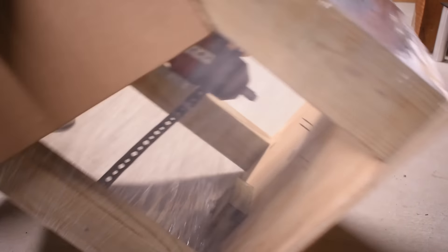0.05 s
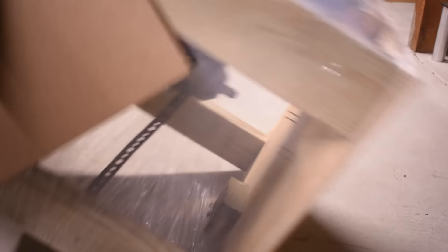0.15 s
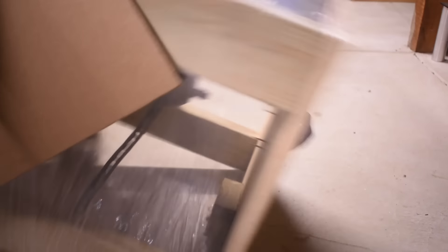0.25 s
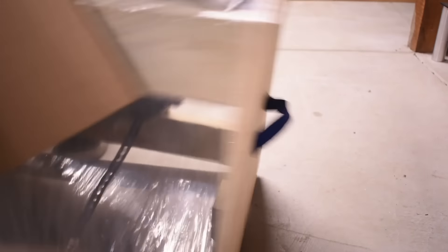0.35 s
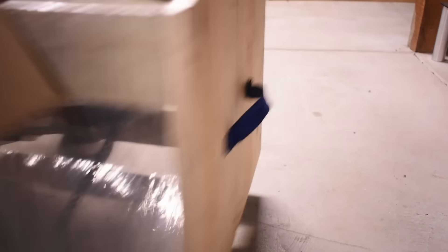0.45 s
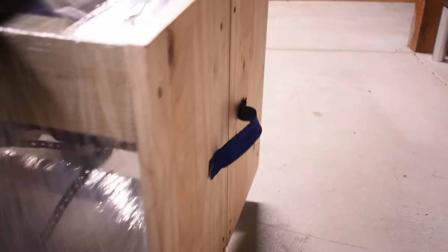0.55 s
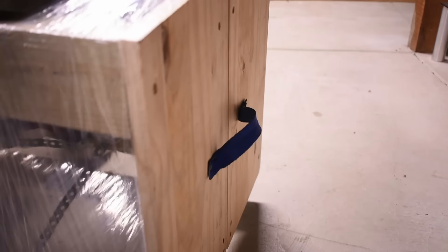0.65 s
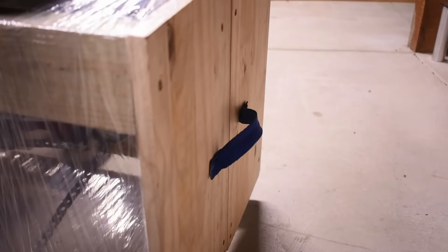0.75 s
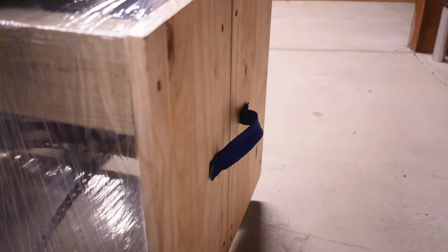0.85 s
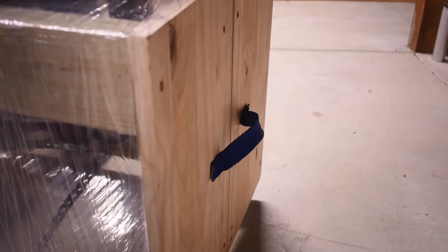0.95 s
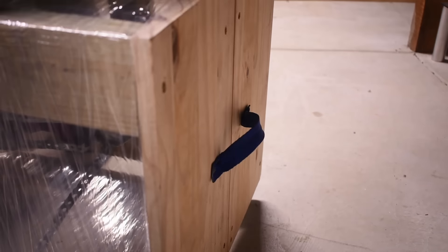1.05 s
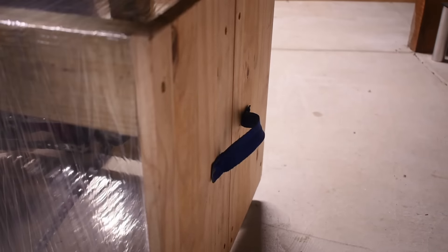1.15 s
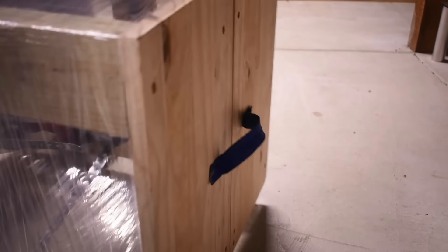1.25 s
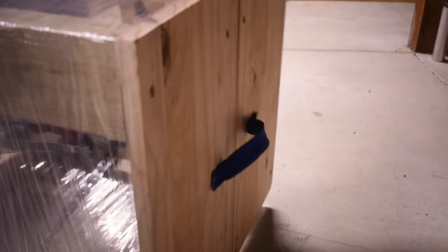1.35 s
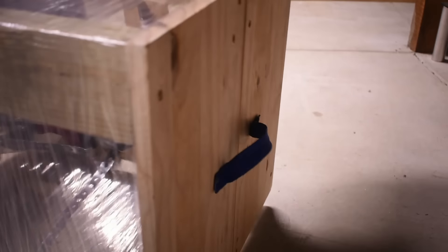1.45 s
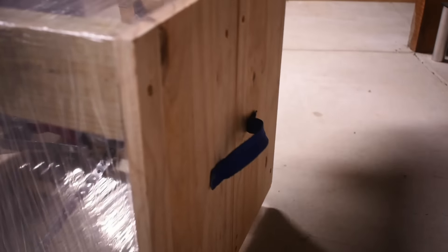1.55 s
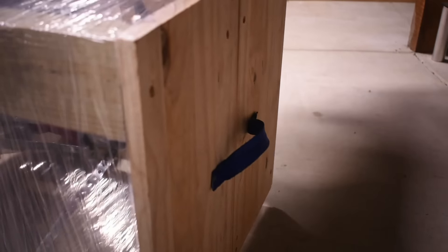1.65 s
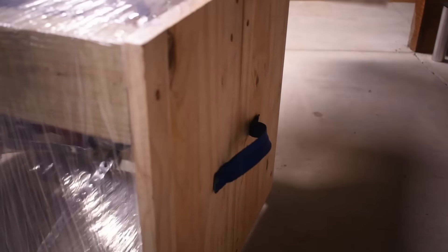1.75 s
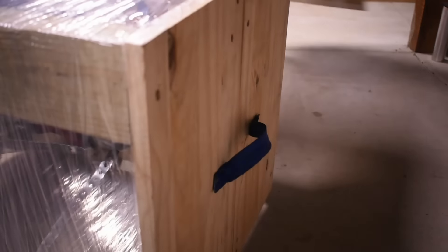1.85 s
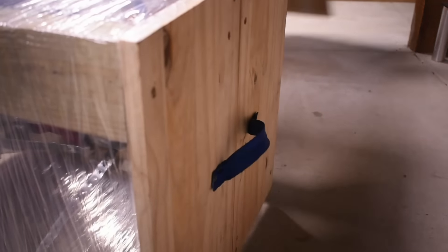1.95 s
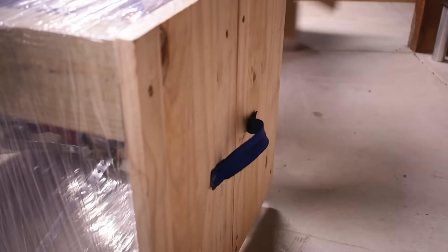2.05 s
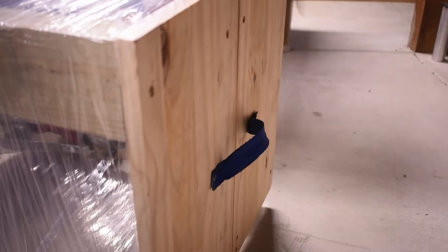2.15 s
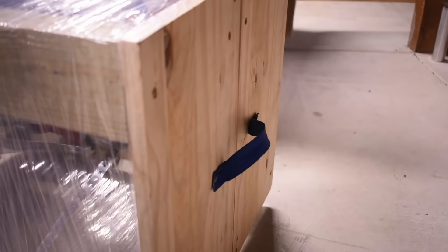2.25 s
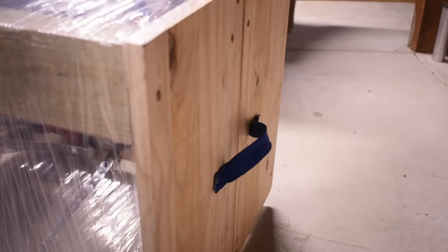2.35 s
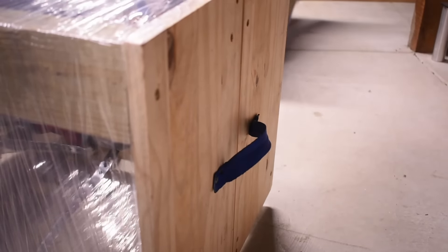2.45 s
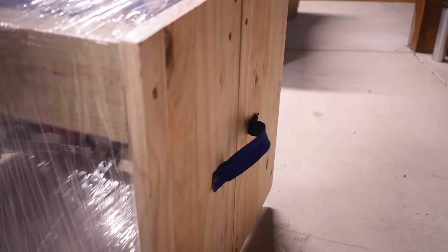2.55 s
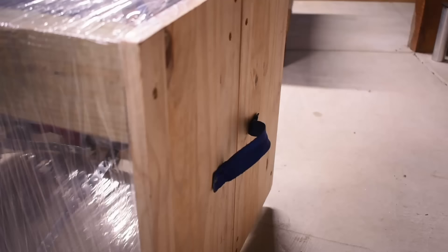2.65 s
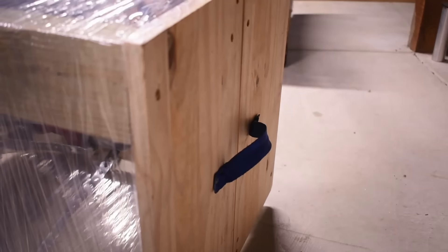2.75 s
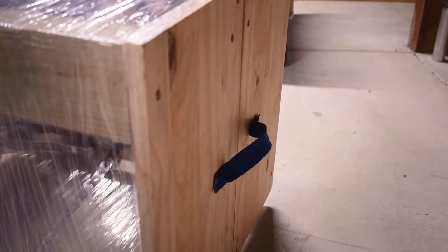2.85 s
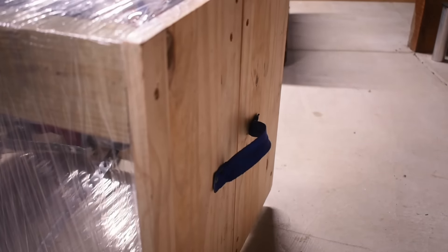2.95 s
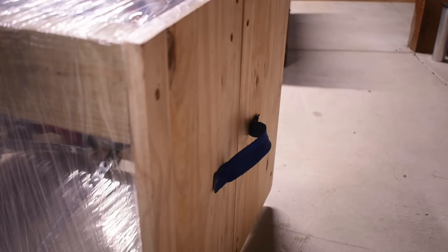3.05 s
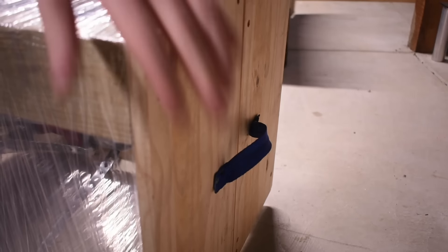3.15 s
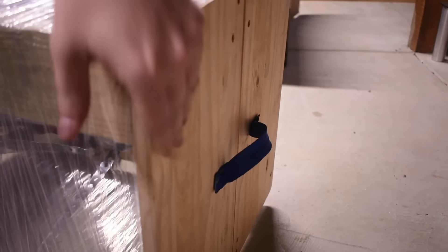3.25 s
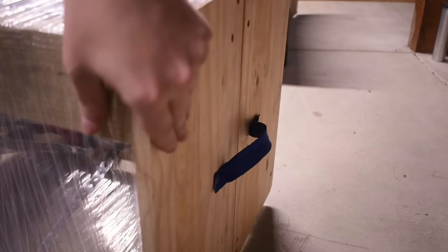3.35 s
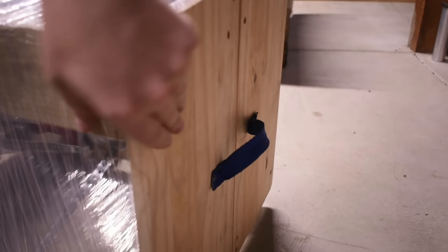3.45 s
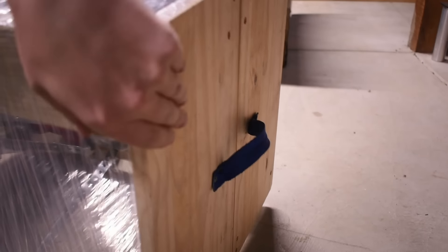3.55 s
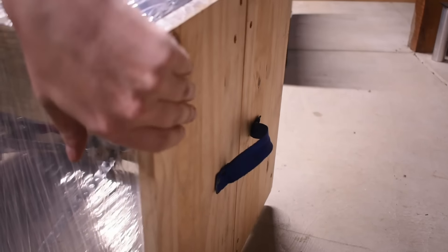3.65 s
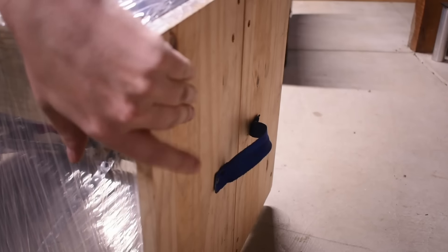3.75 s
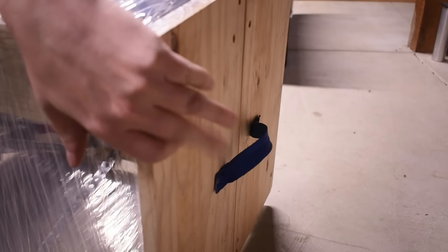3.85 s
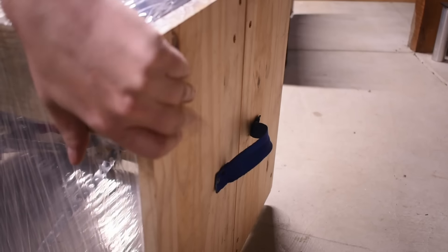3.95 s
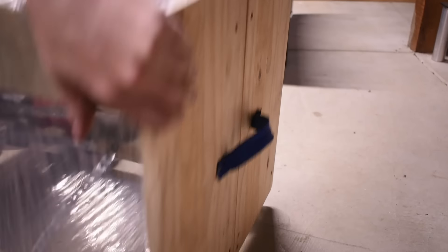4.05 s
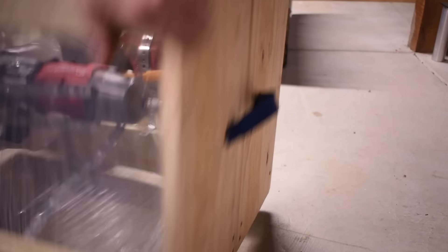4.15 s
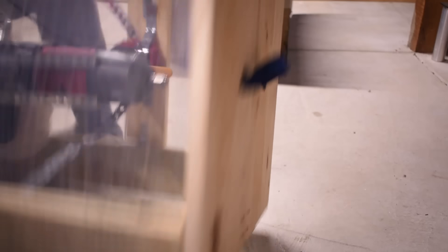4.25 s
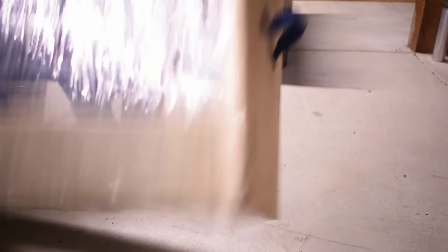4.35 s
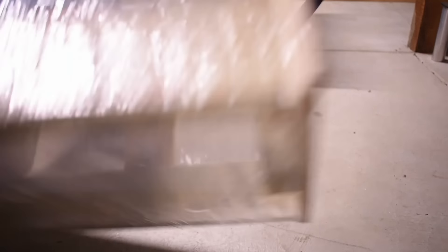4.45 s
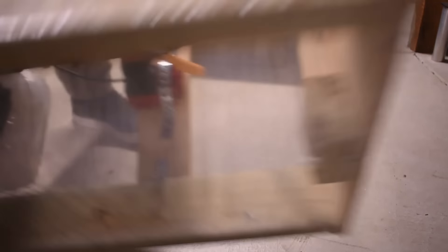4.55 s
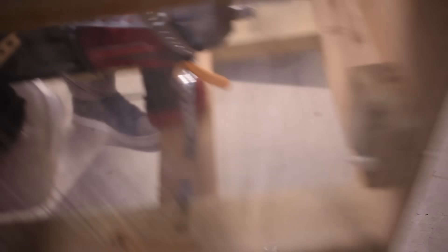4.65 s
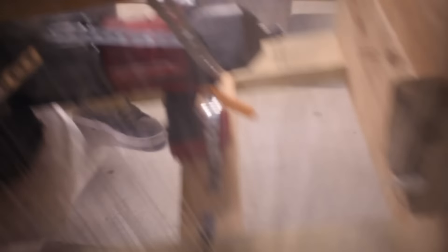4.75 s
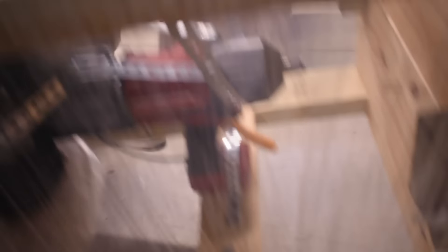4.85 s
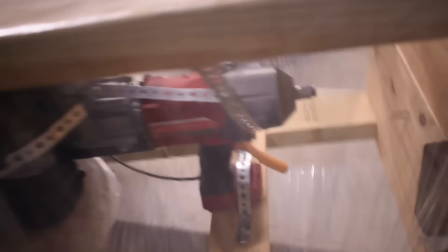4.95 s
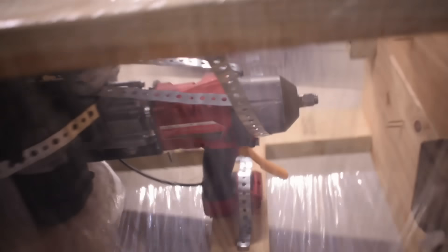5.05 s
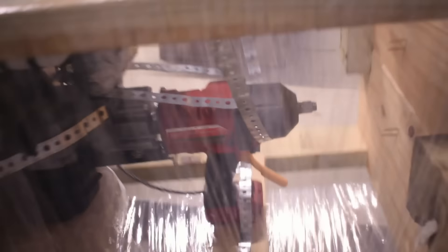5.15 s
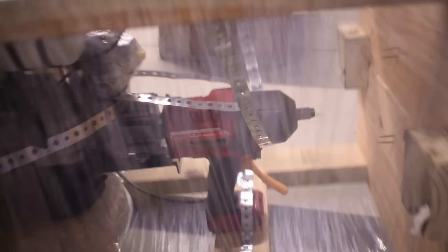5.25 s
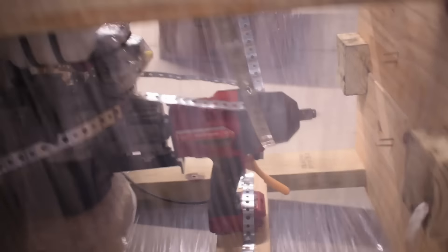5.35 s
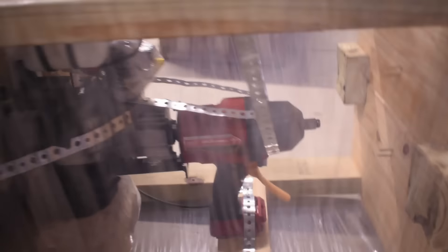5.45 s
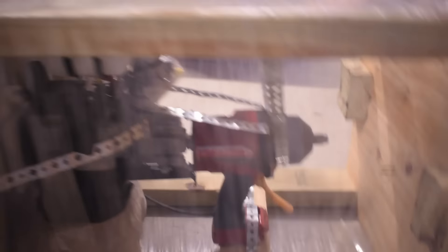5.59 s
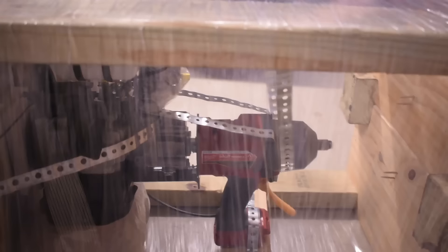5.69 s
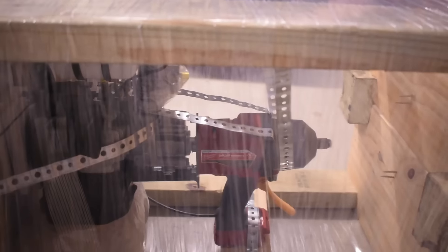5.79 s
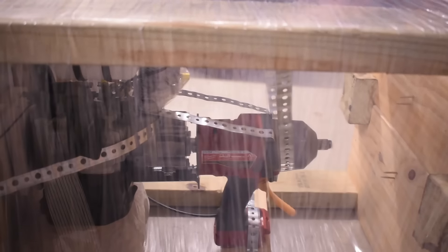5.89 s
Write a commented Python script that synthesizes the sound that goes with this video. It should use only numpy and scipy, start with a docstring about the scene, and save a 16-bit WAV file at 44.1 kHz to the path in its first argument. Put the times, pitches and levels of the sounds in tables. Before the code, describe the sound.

Hollow wooden knocks and crackling stretch wrap as a crate is tipped and shifted on a workshop floor.

```python
"""Hollow wooden knocks and crackling plastic: a crate in stretch wrap is tipped, set down and turned. Each
knock on the workshop floor, and each light tap of fingertips on the boards, rings the boards and shakes the
tight plastic film. Between knocks the film crinkles, rubs and snaps, and the wood drags and squeaks. Steel
straps inside jingle as the crate first comes down. Near the end its open side turns toward the listener and it
sounds hollower."""
import sys
import numpy as np
from scipy import signal
from scipy.fft import irfft
from scipy.io import wavfile
from scipy.ndimage import uniform_filter1d

SR = 44100
rng = np.random.default_rng(int(sys.argv[2]) if len(sys.argv) > 2 else 0)


def materialize(psi):
    """Save the field psi as 16-bit PCM at rate SR to the path in sys.argv[1].

    A 1-D psi becomes a single channel; in a 2-D psi each row is a channel.
    """
    bounded = np.clip(np.atleast_2d(psi).T, -1, 1)
    quanta = np.round(bounded * 32767).astype(np.int16)
    wavfile.write(sys.argv[1], SR, quanta)


N = 261072

# tone of the faint background hush and microphone hiss: pitch_hz, level_db
HUSH_TONE = [(20, 3.5), (33, 15), (60, 3), (110, -5), (170, -3), (250, -8), (500, -28.5), (1000, -17),
             (2500, -22), (6000, -21.5), (16000, -32)]
# how long the workshop's echo takes to fall by 60 dB: pitch_hz, fade_s
ROOM_FADE = [(100, .4), (300, .3), (1000, 0.32), (3000, 0.31), (8000, 0.38), (16000, .26)]
# how much left and right differ, next to what they share: pitch_hz, difference_db
STEREO_WIDTH = [(100, -42), (350, -32), (700, -24), (1400, -27), (2800, -16), (5600, -9.5), (11000, -3.5),
                (15000, -3.5)]
# how far the crate's open side faces the listener: time_s, share_0_to_1
OPEN_SIDE = [(0, 0), (3.9, 0), (4.4, 1), (5.92, 1)]
# tone of sound coming through the open side: pitch_hz, gain_db
HOLLOW_TONE = [(30, -5), (70, -2), (115, -1), (170, -5.5), (250, -2), (480, 0.5), (800, -1.5), (1900, 1.5),
               (3400, 3.5), (5500, -0.5), (8000, -1), (12000, -3.5), (16000, -8.5)]

# how briskly the crate is moved: time_s, motion_db
MOTION = [(0, -17), (.16, -6.5), (.28, -7), (.45, -2), (.66, -6), (.8, -24), (1.13, -29), (1.35, -23),
          (1.55, -36), (1.95, -43), (2.34, -45), (2.66, -20), (2.97, -39), (3.22, -34), (3.5, -41),
          (4.6, -36), (5.24, -33), (5.46, -18), (5.82, -38)]
# how shuffling, rubbing and crinkling (a row each) follow it: full_motion_db, db_per_motion_db
MOTION_RESPONSE = [(-35.5, .97), (-46, .8), (-56, .76)]
# the base scuffs the floor: start_s, length_s, level_db
FLOOR_SCUFFS = [(.885, .065, -52), (1.0, .045, -50), (1.59, .03, -59), (1.69, .08, -62), (1.84, .07, -69),
                (2.03, .06, -65), (3.1, .09, -66), (4.16, .04, -62), (4.72, .03, -63), (4.84, .1, -65),
                (5.68, .018, -42)]
# the film is pulled or slides under a hand: start_s, length_s, rub_db, crinkle_db
HAND_STROKES = [(0, .055, -39, -43), (.1, .1, -50, -57), (.2, .08, -47, -59), (.305, .035, -44, -53),
                (.48, .03, -41, -55), (.588, .035, -34, -56), (.635, .03, -43, -51), (.74, .05, -56, -65),
                (.87, .07, -60, -68), (1.005, .03, -51, -63), (1.225, .03, -61, -66), (1.31, .09, -61, -64),
                (1.65, .075, -63, -65), (1.815, .03, -71, -77), (2.02, .08, -77, -81),
                (2.125, .06, -48, -48), (2.2, .045, -53, -55), (2.385, .035, -51, -60),
                (2.63, .09, -52, -55), (2.865, .05, -68, -66), (3.06, .07, -70, -75), (3.14, .09, -65, -68),
                (3.37, .07, -72, -76), (4.22, .04, -63, -72), (4.345, .07, -58, -60), (4.53, .13, -79, -77),
                (4.7, .045, -61, -67), (4.8, .14, -62, -66), (5.15, .06, -63, -68), (5.32, .05, -52, -51),
                (5.59, .04, -64, -71), (5.68, .035, -56, -61), (5.87, .05, -63, -70)]
# tones of shuffling wood, rubbing film and crinkling film: pitch_hz, level_db
SHUFFLE_TONE = [(20, -13.5), (32, 1.5), (55, -13), (85, 2), (120, -0.5), (170, -4.5), (235, -1.5),
                (340, -9.5), (520, -9.5), (720, -10), (1100, -29.5), (2500, -46.5)]
RUB_TONE = [(200, -35), (450, -1), (750, 2), (1100, 4.5), (1600, 1.5), (2100, -0.5), (2900, -1.5),
            (4000, -10), (6000, -35), (12000, -51.5)]
CRINKLE_TONE = [(1200, -62), (3000, -10), (4300, 2), (6300, 0), (8000, -3.5), (9500, -5.5), (12000, -6.5),
                (16000, -7)]
# wood and film stick and slip: middle_s, loud_part_s, pitch_hz, width_hz, level_db
SQUEAKS = [(.235, .04, 162, 19, -36), (0.308, 0.028, 243, 17, -40), (0.947, 0.038, 226, 12, -46.5),
           (2.67, .1, 129, 32, -40.5), (2.819, 0.17, 109, 33, -57.5), (3.202, 0.061, 520, 120, -67),
           (3.297, 0.17, 1360, 400, -75), (3.31, 0.09, 296, 50, -62), (3.31, .12, 2480, 800, -76),
           (3.614, 0.048, 215, 64, -61), (3.616, .05, 391, 29, -65.5), (4.236, 0.065, 242, 21, -55.5),
           (5.096, 0.035, 1710, 320, -59.5), (5.096, 0.02, 2760, 1800, -56),
           (5.915, 0.034, 1635, 220, -57.5)]
# the steel straps jingle: start_s, pitch_hz, width_hz, level_db, fade_s
STRAP_RINGS = [(.468, 12750, 110, -49, 0.14), (.478, 9600, 800, -56, .28), (.591, 2643, 119.5, -34, 0.2),
               (.595, 2920, 250, -38.5, 0.18), (.598, 9200, 1100, -51, 0.28)]
# the film snaps: start_s, crack_db, fizz_db
FILM_SNAPS = [(.314, -43, -47), (.664, -54, -64), (.987, -49.5, -72), (1.021, -50, -53),
              (1.236, -61, -59.5), (1.283, -70, -60), (1.48, -61, -66), (1.642, -63, -71),
              (1.972, -75, -74), (2.164, -45.4, -47), (2.598, -52, -58), (2.633, -52, -53.5),
              (3.677, -67, -80), (4.159, -54.4, -58.5), (4.192, -56, -66), (4.3165, -38, -55),
              (4.455, -47.5, -48.5), (4.686, -51, -63), (4.962, -35, -36.5), (5.081, -52.5, -80),
              (5.329, -48, -48), (5.373, -46.5, -51.5), (5.472, -53, -58), (5.514, -57.5, -58.5),
              (5.559, -60.5, -63.5), (5.678, -49, -50), (5.719, -51, -53.5), (5.862, -66.5, -66.5)]

# the notes the boards ring at: pitch_hz, level_db, fade_s
BOARD_NOTES = [(92, -11.5, 0.23), (117, -7.5, 0.55), (134, -8, 0.32), (179.5, -4, 0.29), (228.6, -0.5, .26),
               (240.8, -3, 0.28), (266.2, -4, 0.29), (302.3, -6.5, 0.26), (321.5, -3, .17),
               (375, -9.5, .18), (429, -11, 0.3), (479.3, -5, 0.14), (534.2, -5.5, 0.15), (590, -8, .17),
               (685, -6, 0.13), (774, -12, .2), (887, -14, 0.29), (985, -3.5, 0.12), (1045, -6.5, 0.24),
               (1415, -18, .18), (1665, -7, 0.11), (1807, -11, 0.13), (2008, -17, 0.15), (2160, -25.5, 0.2),
               (2510, -17.5, .2), (2680, -29.5, .25)]
# their many weaker notes, blurred into a wash of noise: pitch_hz, level_db
WASH_TONE = [(50, -7), (110, -5.5), (250, -3.5), (550, 0.5), (1000, -9), (1600, -10.5), (2800, -19),
             (4500, -20.5), (7000, -35.5), (16000, -42)]
# a knock's boom, thud, body, clack and film buzz (a row each): low_hz, high_hz
KNOCK_BANDS = [(70, 185), (185, 350), (350, 1300), (1300, 4200), (4200, 16000)]
# what each spot on the crate brings out when struck: lower_hz, upper_hz, thud_db, clack_db, buzz_db
CRATE_SPOTS = {"frame": (195, 735, 5, -9, -15), "corner": (232, 485, 4, -14, -27),
               "side": (319, 515, 0, -13, -26), "base": (126, 500, -2, -8, -16),
               "lid": (240, 1050, 1, -5, -19), "rim": (227, 2400, 6, -5, -14)}
# blows to the crate, from knocks on the floor to light fingertip taps: start_s, spot, strength_db, hardness_db,
# boom_db, contact_s
KNOCKS = [(.165, "frame", -49, -3, -52, .034), (.214, "frame", -46, 2, -48, .042),
          (.355, "frame", -39, -2.5, -42, .058), (.4267, "lid", -26, -2, -40, .032),
          (.4334, "corner", -23, 0, -35, .027), (.488, "frame", -40, -2.5, -37, .019),
          (.559, "frame", -32.5, -3.5, -32, .048), (.988, "rim", -47.5, 2.5, -56.5, .021),
          (1.165, "lid", -50, 4, -54, .026), (1.291, "corner", -51, 1, -49, .023),
          (1.464, "frame", -70, -13, -55, .015), (1.613, "frame", -63, -8, -54.5, .0065),
          (2.008, "side", -67, -4, -75, .022), (2.125, "side", -24.8, -2, -40.5, .018),
          (2.16, "side", -32.5, 1, -52, .008), (2.213, "side", -49, -5, -49.5, .022),
          (2.3745, "side", -47.5, 1, -50, .053), (2.4718, "side", -25.3, .5, -34, .024),
          (2.526, "base", -49, -6, -41, .012), (2.599, "corner", -45, 1.5, -49, .055),
          (2.639, "base", -50, -2, -42, .037), (2.696, "base", -52, 3, -49, .012),
          (2.828, "lid", -64, 0, -66, .024), (2.886, "base", -63, -2, -59, .024),
          (3.036, "side", -71, -3, -70.5, .025), (3.29, "lid", -69, -2, -72.5, .025),
          (3.557, "lid", -75, 3, -80, .009), (3.668, "base", -70, -2, -64, .018),
          (3.747, "frame", -70, 1, -73, .0075), (3.83, "lid", -72, 3, -76, .022),
          (3.984, "lid", -68, 2, -72.5, .015), (4.214, "corner", -61, -1, -65, .055),
          (4.317, "rim", -35.5, -2.5, -42, .019), (4.952, "frame", -36, .5, -34, .008),
          (5.339, "side", -42, 1, -46.5, .031), (5.41, "lid", -54, -1, -48, .013),
          (5.661, "base", -44, -3, -48, .03)]

FILM_LIMIT_DB = -54  # the tight film can only get so loud, however hard the blow


def amp(db):
    """Turns decibels into a number to multiply by."""
    return 10 ** (np.asarray(db) / 20)


def unit(x, size=None):
    """Scales a sound so its average level (rms) is 1, judged over the first size samples."""
    return x / np.sqrt(np.mean(x[:size] ** 2) + 1e-20)


def read(points, hz):
    """Looks up a table by pitch, sliding between rows in octaves."""
    f, value = np.transpose(points)
    return np.interp(np.log(hz + 1), np.log(f + 1), value)


def add(mix, start_s, sound):
    """Mixes a sound in at the given time."""
    part = mix[max(round(start_s * SR), 0):][:len(sound)]
    part += sound[:len(part)]


def colour(x, tone, size=4096):
    """Shapes a sound with a tone table, without smearing it earlier in time."""
    log_gain = np.log(amp(read(tone, abs(np.fft.fftfreq(size, 1 / SR)))))
    response = np.fft.ifft(np.exp(np.conj(signal.hilbert(log_gain)))).real
    return signal.oaconvolve(x, response[:size // 2])[:len(x)]


def band(x, low_hz, high_hz):
    """Keeps the sound between two pitches."""
    return signal.sosfilt(signal.butter(3, [low_hz, high_hz], "band", fs=SR, output="sos"), x)


def random_phases(shape):
    """A random starting point in each wave's cycle."""
    return np.exp(2j * np.pi * rng.random(shape))


def fuzzy_tone(hz, width_hz, size):
    """Noise squeezed in around one pitch."""
    f = np.fft.rfftfreq(size, 1 / SR)
    return unit(irfft(random_phases(len(f)) / (1 + (2 * (f - hz) / width_hz) ** 4), size))


def clicks(size, per_s, spread_db):
    """Tiny random clicks, as when film buckles: most small, a few large."""
    strength = amp(spread_db * np.minimum(rng.exponential(1, size), 4))
    return unit(strength * rng.choice([-1, 1], size) * (rng.random(size) < per_s / SR))


def background_hush(level_db=-77):
    """Faint background hush and microphone hiss."""
    return amp(level_db) * unit(colour(rng.standard_normal(N), HUSH_TONE))


def echo_tail(size):
    """Noise in which each pitch dies away at the room's own speed."""
    hz, t, spectrum = signal.stft(rng.standard_normal(size), SR, nperseg=256)
    fade = amp(-60 * t / read(ROOM_FADE, hz)[:, None])
    return signal.istft(spectrum * fade, SR, nperseg=256)[1][:size]


def room(x, echo_db):
    """The direct sound, followed by the workshop's short echo."""
    tail = echo_tail(SR // 2)
    tail[:SR // 300] = 0
    return x + amp(echo_db) * signal.oaconvolve(x, tail / np.linalg.norm(tail))[:len(x)]


def stereo(mid, width_db):
    """Left and right are most alike in the bass and differ more in the treble."""
    hz, _, spectrum = signal.stft(mid, SR, nperseg=256)
    side_gain = amp(np.minimum(read(STEREO_WIDTH, hz) + width_db, 3))[:, None]
    side = signal.istft(spectrum * random_phases(spectrum.shape) * side_gain, SR, nperseg=256)[1][:N]
    return np.array([mid + side, mid - side])


def open_side(x):
    """As the open side turns to the listener, the sound gets hollower and loses its top."""
    share = np.interp(np.arange(N) / SR, *np.transpose(OPEN_SIDE))
    return (1 - share) * x + share * colour(x, HOLLOW_TONE)


def swell_power(length_s, rise_s=.02, fall_db_per_s=230):
    """The power of one movement: it swells, holds and dies away."""
    t = np.arange(SR // 2) / SR
    return (np.minimum(t / rise_s, 1) * amp(-fall_db_per_s * np.maximum(t - length_s, 0))) ** 2


def handling_levels(rock_db=1.5, shaken_rub_db=-15, shaken_crinkle_db=-27):
    """How loud shuffling, rubbing and crinkling are over time; the movements add up as power."""
    motion_db = np.interp(np.arange(N) / SR, *np.transpose(MOTION))
    shuffling, rubbing, crinkling = (amp(db + slope * motion_db) ** 2 for db, slope in MOTION_RESPONSE)
    # after a knock the crate rocks and its film rustles
    settling = swell_power(length_s=.028, rise_s=.028, fall_db_per_s=215)
    for start_s, _, strength_db, hardness_db, boom_db, _ in KNOCKS:
        shake_db = strength_db + hardness_db / 2
        add(shuffling, start_s, amp(boom_db + rock_db) ** 2 * settling)
        add(rubbing, start_s, amp(shake_db + shaken_rub_db) ** 2 * settling)
        add(crinkling, start_s, amp(min(shake_db + shaken_crinkle_db, FILM_LIMIT_DB)) ** 2 * settling)
    for start_s, length_s, level_db in FLOOR_SCUFFS:
        add(shuffling, start_s, amp(level_db) ** 2 * swell_power(length_s))
    for start_s, length_s, rub_db, crinkle_db in HAND_STROKES:
        stroke = swell_power(length_s)
        add(rubbing, start_s, amp(rub_db) ** 2 * stroke)
        add(crinkling, start_s, amp(crinkle_db) ** 2 * stroke)
    return np.sqrt([shuffling, rubbing, crinkling])


def handling(shuffle_db=-2, rub_db=-1, crinkle_db=-1, clump_db=1.46):
    """Hands turn the crate: its base scuffs the floor while the film rubs and crinkles."""
    shuffling, rubbing, crinkling = handling_levels()
    scuffs = unit(colour(clicks(N, per_s=1500, spread_db=2.2), SHUFFLE_TONE))
    # buckles come in clumps as one crease after another gives way
    clumps = amp(clump_db * unit(uniform_filter1d(rng.standard_normal(N), size=400)))
    buckles = clicks(N, per_s=1700, spread_db=2.5) * clumps
    # clinging layers peel apart in a few very bright ticks
    ticks = .3 * unit(band(clicks(N, per_s=45, spread_db=2), 5000, 13000))
    grain = 1.4 * clicks(N, per_s=6000, spread_db=3.4)
    rub = unit(colour(room(buckles + grain, echo_db=-4), RUB_TONE))
    crinkle = unit(colour(room(buckles, echo_db=2), CRINKLE_TONE)) + room(ticks, echo_db=-6)
    return (amp(shuffle_db) * shuffling * scuffs
            + amp(rub_db) * rubbing * rub
            + amp(crinkle_db) * crinkling * crinkle)


def squeaks():
    """Wood and film stick and slip, making short groans and chirps that swell and fade."""
    out = np.zeros(N)
    for middle_s, loud_part_s, hz, width_hz, level_db in SQUEAKS:
        swell = signal.windows.hann(round(1.7 * loud_part_s * SR))
        tone = unit(fuzzy_tone(hz, width_hz, SR // 2)[:len(swell)])
        add(out, middle_s - len(swell) / SR / 2, amp(level_db) * tone * swell)
    return room(out, echo_db=-6)


def strap_jingle(rise_s=.0087, boost_db=2):
    """Steel straps shiver as the crate comes down."""
    out, t = np.zeros(N), np.arange(SR // 2) / SR
    for start_s, hz, width_hz, level_db, fade_s in STRAP_RINGS:
        loudness = amp(level_db + boost_db - 60 * t / fade_s) * (1 - np.exp(-t / rise_s))
        add(out, start_s, loudness * fuzzy_tone(hz, width_hz, len(t)))
    return out


def film_snaps(crack_s=.0067, cluster_s=.027, cluster_db=-5, tail_db=-15, trim_db=-1):
    """A fold of film lets go with a sharp crack and a quick cluster of buckles."""
    out, t = np.zeros(N), np.arange(SR // 4) / SR
    onset = round(.015 * SR)  # levels are set over these first samples
    release = np.exp(-t / crack_s) + amp(cluster_db) * np.exp(-t / cluster_s)
    for start_s, crack_db, fizz_db in FILM_SNAPS:
        burst = clicks(len(t), per_s=6000, spread_db=3) * release + amp(tail_db) * echo_tail(len(t))
        add(out, start_s, amp(crack_db + trim_db) * unit(colour(burst, RUB_TONE), onset))
        add(out, start_s, amp(fizz_db + trim_db) * unit(colour(burst, CRINKLE_TONE), onset))
    return out


def film_buzz(t, contact_s, fade_s=.024):
    """Film shaken by a knock goes on buzzing after the wood stops chattering."""
    shaken = np.exp(-np.maximum(t - 1.1 * contact_s, 0) / fade_s)
    jolt = 1 + .45 * np.exp(-t / .0035)
    return colour(clicks(len(t), per_s=5000, spread_db=2.4) * shaken * jolt, CRINKLE_TONE)


def spot_boost(hz, lower_hz, upper_hz, lower_db=9, upper_db=13, width_octaves=.22):
    """The spot that is struck brings out the boards' notes near two pitches."""
    near_lower = np.exp(-(np.log2(hz / lower_hz) / width_octaves) ** 2)
    near_upper = np.exp(-(np.log2(hz / upper_hz) / width_octaves) ** 2)
    return amp(lower_db * near_lower + upper_db * near_upper)


def crate_knocks(crack_db=1.5, crack_s=.004, settle_s=.008, wash_db=-3, tail_db=-8, tail_fade_s=.3):
    """Each blow strikes with a crack and chatters briefly; the crate's boards ring and its film buzzes."""
    out, t = np.zeros(N), np.arange(SR * 2 // 5) / SR
    onset = round(.035 * SR)  # levels are set over these first samples
    wash_hz = np.fft.rfftfreq(len(t), 1 / SR) + 1
    note_hz, note_db, fade_s = np.transpose(BOARD_NOTES)
    notes = amp(note_db[:, None] - 60 * t / fade_s[:, None]) * np.exp(2j * np.pi * note_hz[:, None] * t)
    crack = amp(crack_db) * np.exp(-t / crack_s)
    tail = amp(tail_db - 60 * t / tail_fade_s)
    for start_s, spot, strength_db, hardness_db, boom_db, contact_s in KNOCKS:
        lower_hz, upper_hz, thud_db, clack_db, buzz_db = CRATE_SPOTS[spot]
        note_gains = spot_boost(note_hz, lower_hz, upper_hz)
        ring = ((note_gains * random_phases(len(note_hz))) @ notes).real
        wash_gains = spot_boost(wash_hz, lower_hz, upper_hz) * amp(read(WASH_TONE, wash_hz))
        wash = irfft(wash_gains * random_phases(len(wash_hz)), len(t))
        chatter = np.exp(-np.maximum(t - contact_s, 0) / settle_s)
        wood = unit(ring * (1 + 1.4 * chatter), onset)
        wood += amp(wash_db) * unit(wash * (crack + chatter + tail), onset)
        # a harder blow gives less thud and more clack and buzz
        soft_db, hard_db = strength_db - hardness_db, strength_db + hardness_db
        parts = [(wood, boom_db), (wood, soft_db + thud_db), (wood, strength_db),
                 (wood, hard_db + clack_db),
                 (film_buzz(t, contact_s), min(hard_db + buzz_db, FILM_LIMIT_DB))]
        for (sound, level_db), edges_hz in zip(parts, KNOCK_BANDS):
            add(out, start_s, amp(level_db) * unit(band(sound, *edges_hz), onset))
    return out


def scene():
    """Wood and film close by, over a faint hush and microphone hiss that differ in left and right."""
    wood = open_side(crate_knocks() + squeaks() + strap_jingle())
    film = open_side(film_snaps() + handling())
    hush = background_hush()
    return stereo(wood, width_db=1) + stereo(film, width_db=1) + stereo(hush, width_db=31)


def record(dry):
    """Cuts off the very highest treble."""
    low_pass = signal.firwin(511, cutoff=15820, window=("kaiser", 9), fs=SR)
    return signal.oaconvolve(dry, low_pass[None], "same")


dry = scene()
out = record(dry)
materialize(out)
```